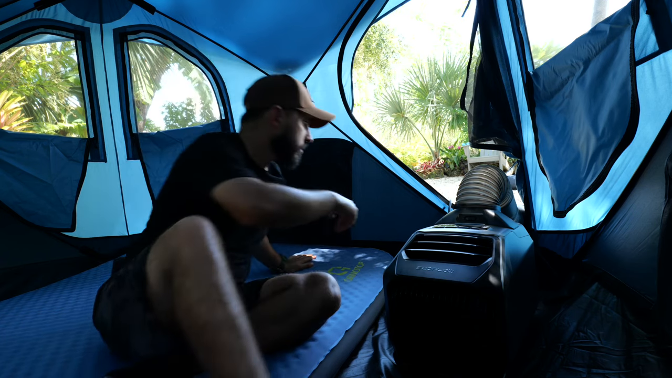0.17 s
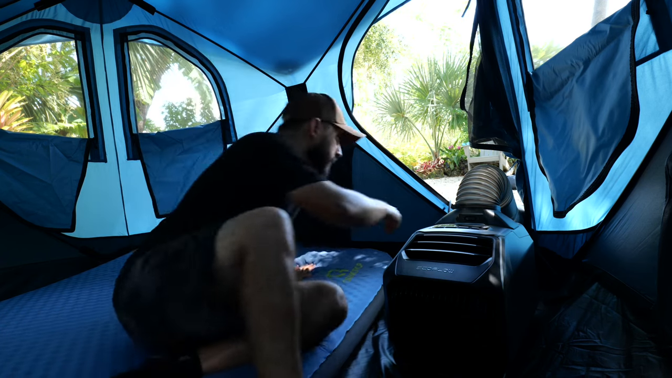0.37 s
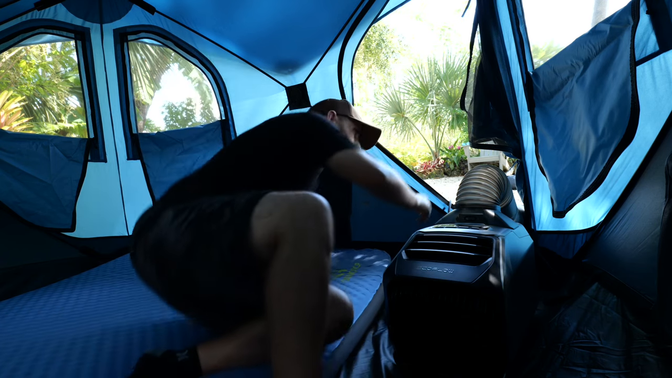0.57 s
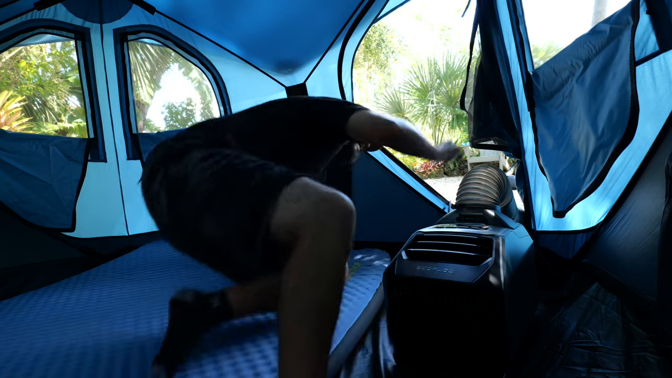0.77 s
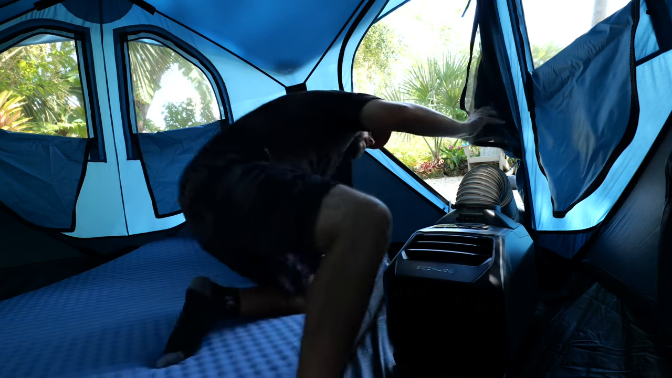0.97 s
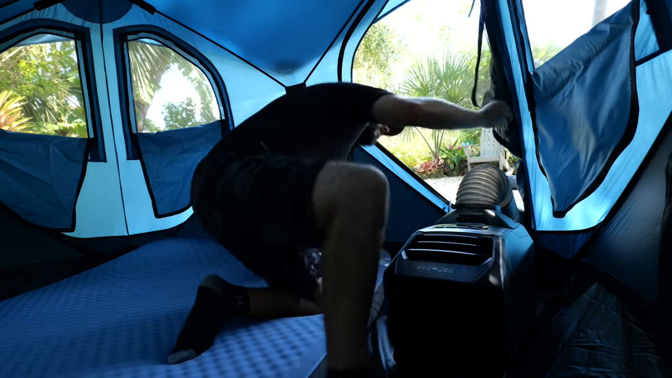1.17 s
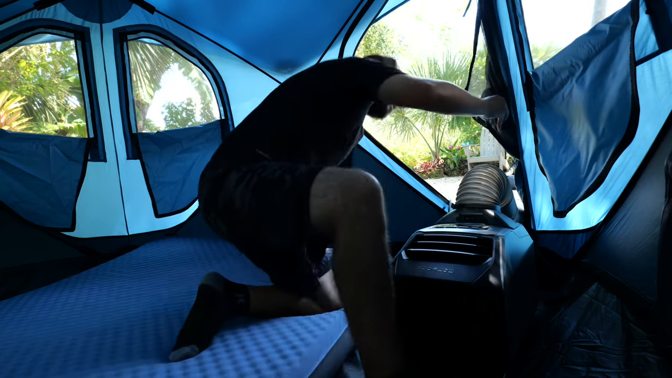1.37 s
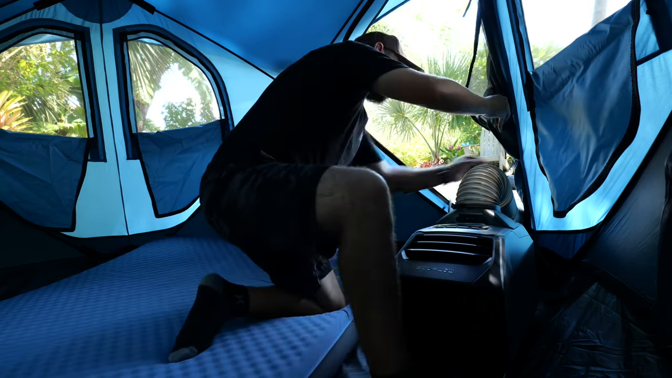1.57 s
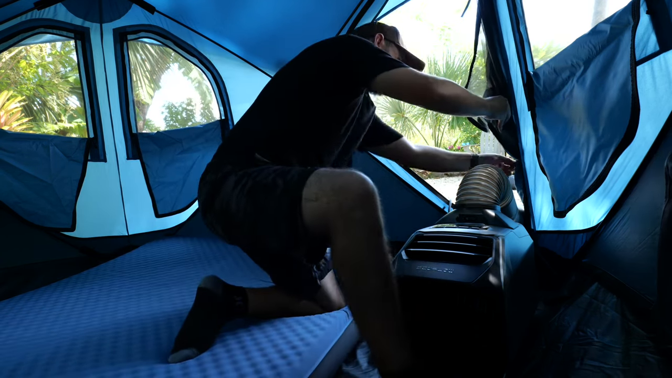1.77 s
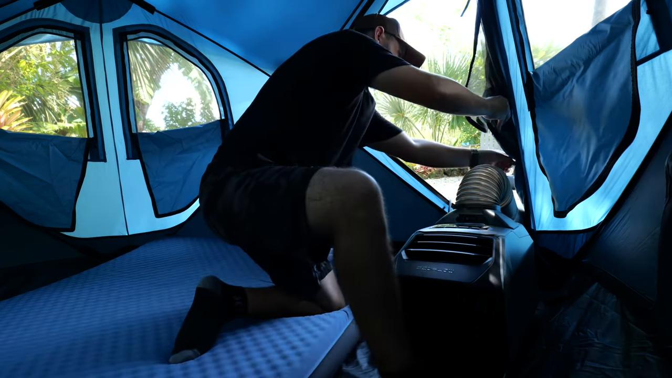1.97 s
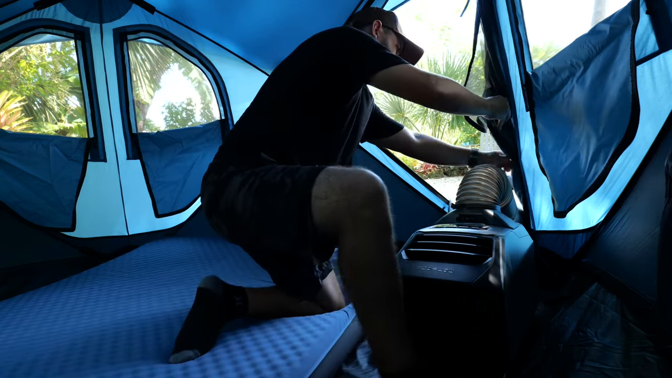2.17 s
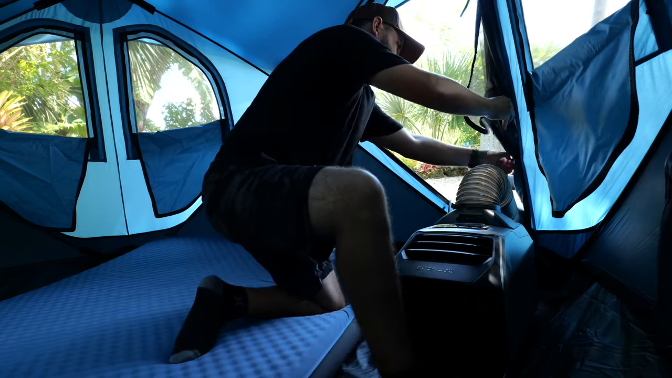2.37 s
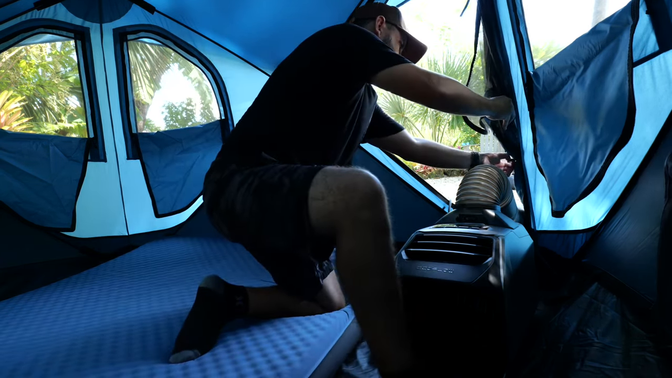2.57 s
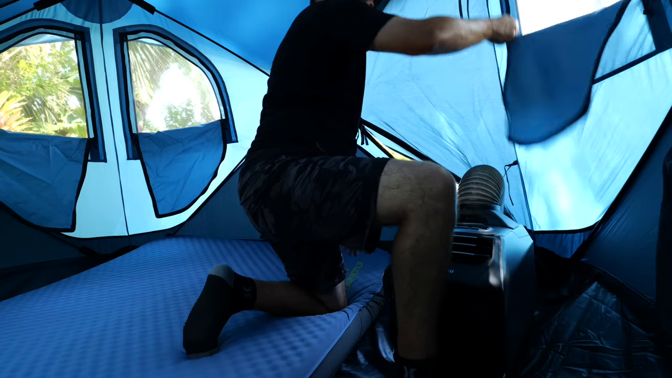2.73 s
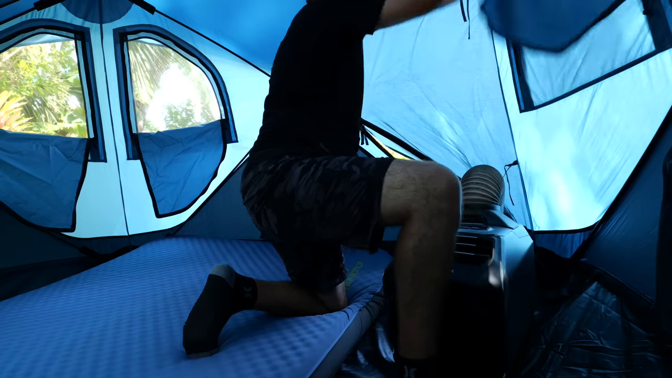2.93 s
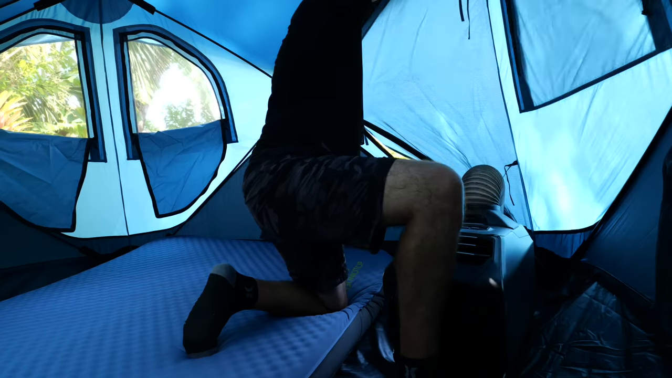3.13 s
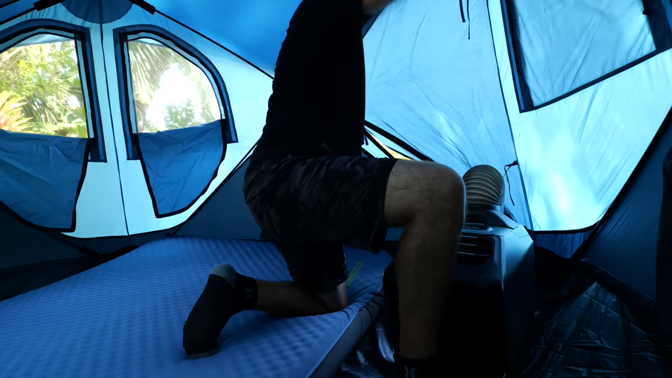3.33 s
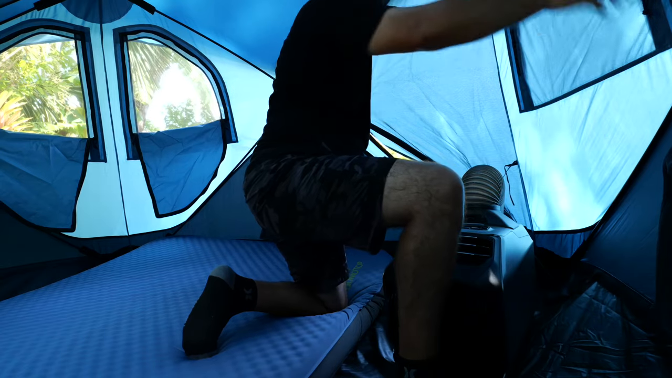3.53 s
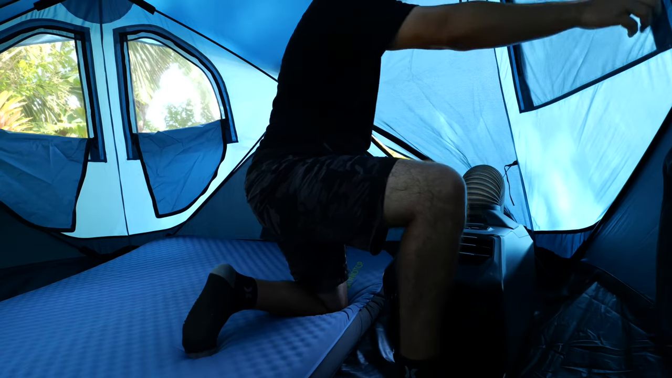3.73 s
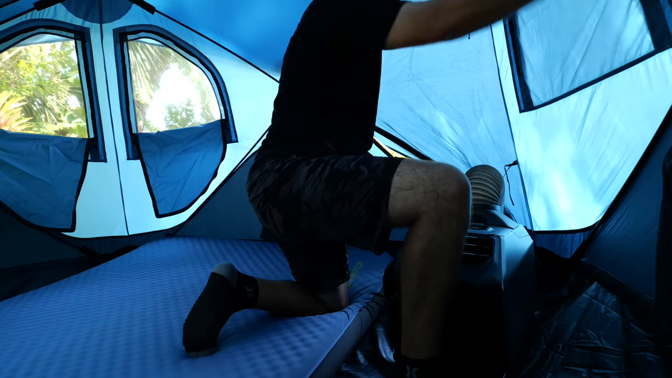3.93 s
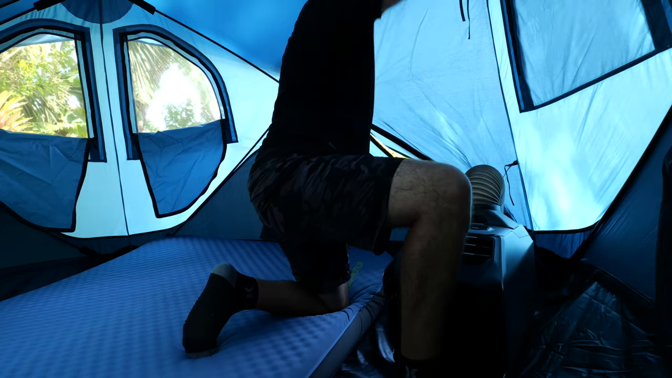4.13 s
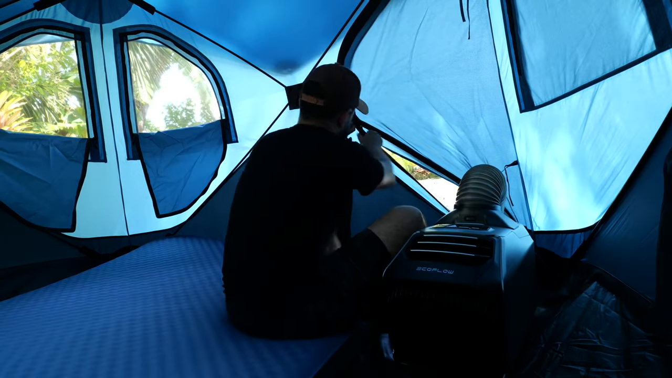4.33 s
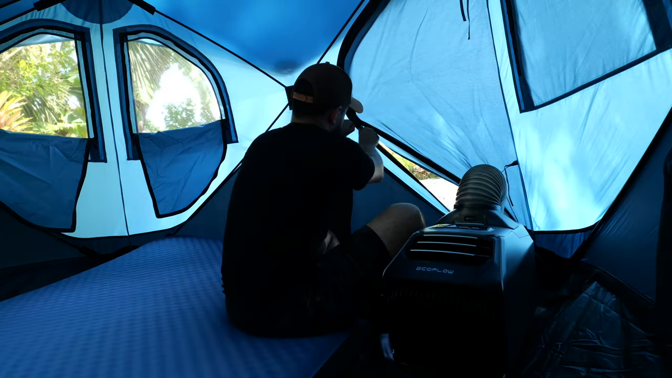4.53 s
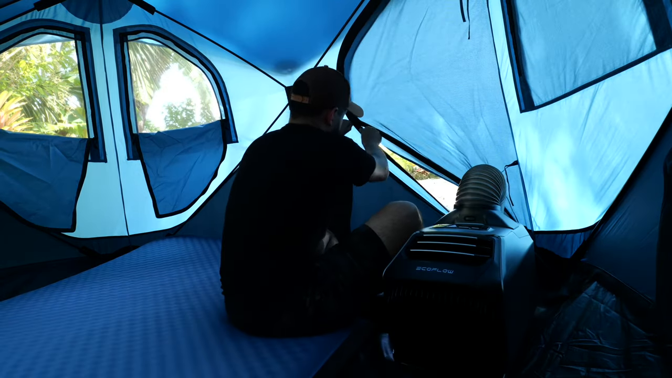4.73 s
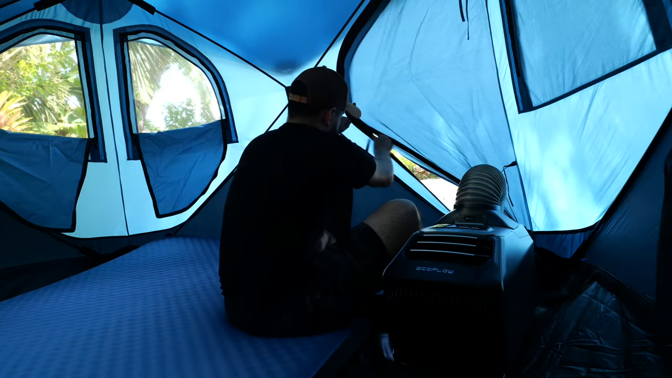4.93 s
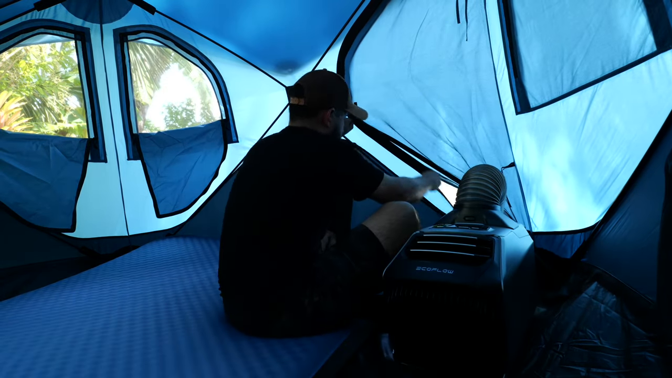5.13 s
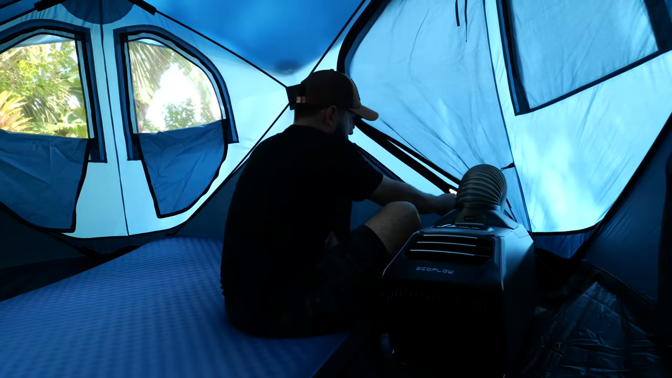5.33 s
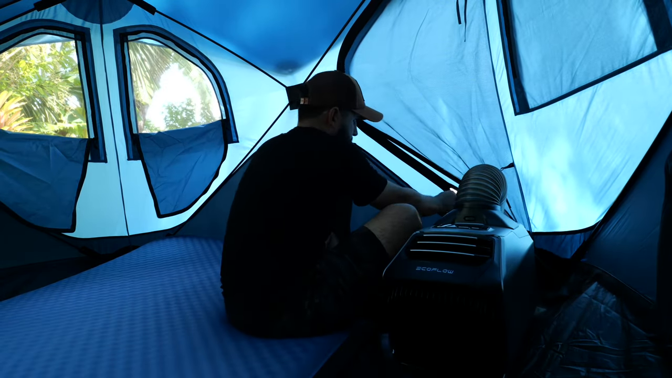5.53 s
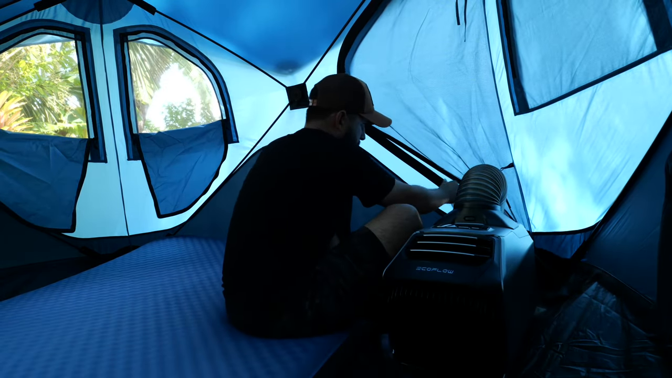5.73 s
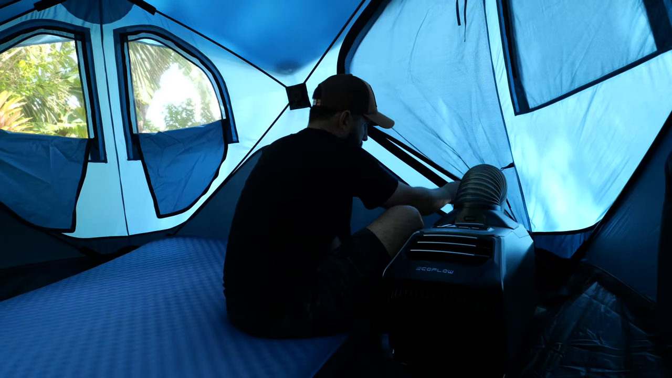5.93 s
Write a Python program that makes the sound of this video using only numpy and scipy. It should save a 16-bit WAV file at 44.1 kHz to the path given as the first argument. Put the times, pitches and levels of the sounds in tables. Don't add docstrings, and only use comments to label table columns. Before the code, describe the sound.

Nylon tent fabric rustles, snaps and billows up close as three zipper pulls rasp and sing, the last one starting slowly after metallic clinks.

```python
import sys
import numpy as np
from scipy import signal
from scipy.fft import rfft, irfft, next_fast_len
from scipy.io import wavfile
from scipy.ndimage import uniform_filter1d, map_coordinates

SR = 44100
rng = np.random.default_rng(int(sys.argv[2]) if len(sys.argv) > 2 else 0)


def decibels_to_gain(level_db):
    exponent = np.asarray(level_db, float) / 20
    return 10 ** exponent


def master_out(mix):
    frames = np.transpose(np.atleast_2d(mix))
    ceiling = np.clip(frames, -1, 1)
    pcm = np.round(ceiling * 32767).astype(np.int16)
    wavfile.write(sys.argv[1], SR, pcm)


N = 268965
T = np.arange(N) / SR
CLICK_RISE_S = 0.0008


def unit(x):
    return x / np.sqrt(np.mean(x ** 2) + 1e-20)


def curves(rows):
    s, *cols = np.transpose(rows)
    gate = np.clip(np.minimum(T - s[0], s[-1] - T) / 0.0035 + 0.5, 0, 1)
    return [np.interp(T, s, c) for c in cols] + [gate]


def wobble(rate):
    coarse = T[::16]
    knots = rng.standard_normal(int(N * rate / SR) + 4)
    return np.interp(T, coarse, map_coordinates(knots, [coarse * rate]))


def blur(rate):
    return (wobble(rate) + 1j * wobble(rate)) / np.sqrt(2)


def coloured(x, points, lo_hz, hi_hz):
    m = 2 * next_fast_len(N // 2 + 4096)
    hz = np.fft.rfftfreq(m, 1 / SR) + 1
    f, db = np.transpose(points)
    edges = 1 / np.sqrt((1 + (lo_hz / hz) ** 6) * (1 + (hz / hi_hz) ** 6))
    gain = decibels_to_gain(np.interp(np.log(hz), np.log(f), db)) * edges
    cep = irfft(np.log(gain + 1e-6), m)
    cep[1:m // 2] *= 2
    cep[m // 2 + 1:] = 0
    return unit(irfft(rfft(x, m) * np.exp(rfft(cep)), m)[:N])


def grainy(patchy_db, per_s, spread_db):
    z = signal.stft(rng.standard_normal(N), nperseg=512)[2]
    field = uniform_filter1d(rng.standard_normal(z.shape), size=7, axis=0)
    field = unit(uniform_filter1d(field, size=7, axis=1))
    bed = unit(signal.istft(z * decibels_to_gain(patchy_db * field), nperseg=512)[1][:N])
    sizes = decibels_to_gain(spread_db * np.minimum(rng.exponential(size=N), 4))
    starts = (rng.random(N) < per_s / SR) * sizes
    burst = signal.lfilter([1], [1, -np.exp(-1 / (0.0014 * SR))], starts)
    return bed * (1 + 0.33 * burst)


def add(out, s, piece):
    part = out[round(s * SR):][:len(piece)]
    part += piece[:len(part)]


def strokes(rows, spans, rest_db):
    attack_db_per_s, release_db_per_s = 345, 263
    s, length, press_db, slide_db = np.transpose(rows)[..., None]
    t = T[::16]
    build_db = attack_db_per_s * (s - t).clip(0)
    die_db = release_db_per_s * (t - s - length).clip(0)
    shape_db = press_db - build_db - die_db
    gate = sum((T >= a) * (T < b) for a, b in spans)

    def total(db, floor_db):
        power = decibels_to_gain(2 * floor_db) + decibels_to_gain(2 * db).sum(axis=0)
        return gate * np.interp(T, t, np.sqrt(power))

    return total(shape_db, rest_db), total(shape_db + slide_db, rest_db + np.mean(slide_db))


# start in seconds, length in seconds, pressure in dB, slide in dB re pressure.
STROKES = [(0.066, 0.033, -51, 14.5), (0.284, 0.015, -23, -6), (0.333, 0.31, -27.5, -7.5),
           (0.67, 0.033, -29.5, 1.5), (0.732, 0.19, -38.5, 9.5), (0.925, 0.037, -24, -16),
           (0.986, 0.015, -29.5, -1), (1.036, 0.088, -27.5, 3.5), (1.161, .14, -24, 0.5),
           (1.356, 0.059, -33.5, 1.5), (4.386, 0.052, -24.5, -3.5), (4.472, 0.036, -25, -3.5),
           (4.57, 0.4, -31.5, -4.5), (5.372, 0.2, -34, -6), (5.623, 0.1, -27, -7),
           (5.77, 0.12, -34.5, -2.5), (5.97, 0.05, -26.5, -1.5), (6.055, 0.026, -36, -0.5)]
# [s, s, dB, dB].
TUGS = [(1.53, 0.067, -34, -6), (1.619, 0.026, -27, -4.5), (1.68, .14, -30, -3), (1.85, 0.2, -31.5, -5.5),
        (2.07, 0.11, -30.5, -3.5), (2.199, 0.086, -24.5, -7.5), (2.33, 0.058, -31.5, -2),
        (2.423, 0.046, -25, -6.5), (2.51, 0.07, -34.5, -0.5), (2.621, 0.053, -25.5, -4)]
# [s, s, dB, dB].
REACHES = [(3.079, 0.12, -29.5, -20.5), (3.29, 0.027, -36.5, -25), (3.355, 0.01, -34, -33),
           (3.433, 0.14, -28, -21), (3.63, 0.055, -31, -22), (3.715, .045, -33.5, -16.5),
           (3.8, 0.14, -33, -20.5)]
# frequency in Hz, level in dB per Hz.
NEAR_WEAVE = [(53, -16), (90, -2), (201, -0.5), (376, -4), (579, -3.5), (819, -6.5), (3270, -13.5),
              (7620, -16.5), (14600, -26.5), (15900, -38)]
# frequency in Hz, level in dB per Hz.
DRAGGED_FLAP = [(53, -31), (90, 2), (130, 4.5), (260, -16), (303, -9), (579, -4.5), (735, -9), (1160, -9),
                (1750, -14.5), (2120, -4.5), (4000, -8.5), (5500, -10.5), (7000, -19), (8200, -20),
                (9880, -24.5), (14900, -35.5), (15900, -40)]
# frequency in Hz, level in dB per Hz.
FAR_WEAVE = [(53, -28), (90, -7), (401, -9), (784, -18), (855, -20.5), (1470, -21), (1640, -20),
             (3000, -24.5), (15900, -51)]
HANDLED = [
    [(0, 1.5), (4.306, 6.1)],
    [(1.5, 2.704)],
    [(2.704, 4.306)],
]
# resting level in dB, sheen in dB re swish, unrest as a factor.
FEEL = [
    (-43.5, -11.5, 0.71),
    (-48, -0.5, 0.43),
    (-42.5, -14, 1),
]


def cloth():
    out = np.zeros(N)
    jerk = 1.1 * wobble(25) + 1.6 * wobble(70)
    closer_db = 8.5 * (T > CUTS[1][0])
    weaves, handling = (NEAR_WEAVE, DRAGGED_FLAP, FAR_WEAVE), (STROKES, TUGS, REACHES)
    for weave, rows, spans, (rest_db, sheen_db, unrest) in zip(weaves, handling, HANDLED, FEEL):
        hand = decibels_to_gain(unrest * jerk)
        folds = grainy(patchy_db=3.9 * unrest, per_s=200, spread_db=4.5) * decibels_to_gain(1.2 * unrest * wobble(50))
        crumple = coloured(folds * hand, weave, 152, 1410)
        rub = grainy(patchy_db=1.76 * unrest, per_s=120, spread_db=1.0)
        swish = coloured(rub * hand, weave, 2400, 6030)
        threads = grainy(patchy_db=4.9 * unrest, per_s=150, spread_db=5.0)
        sheen = coloured(threads * hand, weave, 6150, 19000)
        press, slide = strokes(rows, spans, rest_db)
        out += press * crumple + slide * (decibels_to_gain(-2.5) * swish + decibels_to_gain(sheen_db + closer_db) * sheen)
    return out


# time in seconds, teeth per second, drag in dB, singing in dB.
PULL_A = [(2.704, 422, -17, -19), (2.752, 574, -9.5, -11.5), (2.79, 484, -12, -15), (2.855, 450, -11, -21),
          (2.89, 586, -11.5, -9.5), (2.94, 764, -10, -14.5), (2.98, 875, -12, -25),
          (3.055, 730, -11.5, -22), (3.081, 650, -17, -36)]
PULL_B = [(3.887, 623.1, -12.5, -29), (3.935, 665.3, -20.5, -13), (4.01, 976, -21.5, -35),
          (4.095, 886, -14.5, -28), (4.125, 1075, -15, -24), (4.199, 929, -17.5, -12.5),
          (4.263, 825, -17, -12.5), (4.281, 669, -10.5, -22.5), (4.305, 673, -34, -42)]
PULL_C = [(4.819, 136.2, -12, -28), (4.904, 145.8, -10, -13.5), (4.938, 198.5, -13.5, -13.5),
          (4.998, 494, -14.5, -21.5), (5.063, 677.9, -19.5, -17), (5.186, 410.8, -23.5, -25.5),
          (5.233, 454.5, -20.5, -14.5), (5.306, 236.6, -14.5, -27.5), (5.35, 118, -52, -24)]
# timing scatter in tooth gaps, noise share 0-1, tone blur 0-1, kick of a bent tooth in dB.
SLIDER = [
    (.085, .75, .5, 0),
    (.1, .8, .72, 3),
    (.04, .7, .4, 2),
]
OVERTONES = [
    (-11.5, -44, -26, -41, -58),
    (-15.5, -25, -27.5, -40, -39),
    (-7.5, -6, -15.5, -17.5, -19.5),
]
# frequency in Hz, level in dB per Hz.
PANEL = [
    [(88, -75), (150, -12), (327, -8.5), (438, -17.5), (575, -2.5), (1010, -5.5), (1230, -0.5),
     (1900, -14.5), (2300, -13), (2750, -22.5), (4500, -30), (9520, -46.5), (15800, -53)],
    [(88, -55), (150, -31), (587, -16.5), (955, -11), (1380, -15.5), (2000, -25.5), (2480, -29),
     (4720, -37.5), (5630, -46.5), (15800, -54)],
    [(88, -82), (150, -4), (285, -10.5), (438, -10), (647, -1.5), (727, -12), (866, -5.5), (1500, -23.5),
     (5000, -25), (5600, -28), (6200, -25.5), (7390, -25), (15800, -35)],
]
# octave tone in dB, its share of the singing swings,
# hiss in dB at 500 teeth per s, hiss in dB per octave of speed.
VOICE = [
    (-27, 0.082, -35, 2.5),
    (-29, 0.4, -48, 11.5),
    (-21, 0.11, -25.5, 1.5),
]
# frequency in Hz, half width in Hz, gain in dB.
CROSSED = [
    [(557, 59, 0.5), (1160, 65, 4.5), (2250, 300, 1.5)],
    [(800, 82, 3.5), (1300, 84, 7.5), (1700, 71, 3), (4400, 500, 10)],
    [(630, 73, 0.5), (880, 52, 8.5), (2000, 430, -4.5), (2780, 320, 2), (4000, 700, 10.5)],
]
# time in seconds, half width in seconds, share of speed.
LURCHES = [(2.8, 0.0097, -0.057), (2.831, 0.0094, 0.073), (2.958, 0.0082, 0.057), (4.04, 0.013, 0.046),
           (4.067, .012, -0.05), (4.205, .01, -.03), (4.232, 0.0071, 0.065), (4.247, 0.0059, -.07)]
# time in seconds, level change in dB.
SNAGS = [(2.783, -3), (2.806, -4), (2.853, -3.5), (2.927, -3), (2.975, 0), (2.992, -5), (3.012, -26),
         (4.051, -3), (4.116, -13), (4.17, -4), (4.209, -11), (4.241, -3), (4.269, -5.5), (4.963, -9),
         (5.13, 1.5), (5.196, 1), (5.262, -1)]


def zipper(rows, slider, overtones, panel, voice, crossed):
    rate, rasp_db, first_db, gate = curves(rows)
    rate = rate * (1 + sum(part * np.exp(-((T - s) / width) ** 2) for s, width, part in LURCHES))
    speed_octaves = np.log2(rate / 500)
    octave_db, share, hiss_db, hiss_db_per_octave = voice
    scatter, noisy, smear, bent_db = slider

    start_s, stop_s = 0.0053, 0.03
    moving = np.clip(np.minimum((T - rows[0][0]) / start_s, (rows[-1][0] - T) / stop_s), 0.03, 1)
    second_db = octave_db + share * (first_db + 15) + 20 * np.log10(moving)
    hiss_db = hiss_db + hiss_db_per_octave * speed_octaves + 20 * np.log10(moving)
    hiss_db += -7.5 * np.exp(-((T - 4.96) / 0.045) ** 2)

    fast = np.clip(rate / 400, 0.3, 1)
    teeth = np.cumsum(rate) / SR + scatter * (wobble(120) + wobble(45))

    def flutter(depth_db):
        return decibels_to_gain(depth_db * wobble(70))

    def lift(k):
        return decibels_to_gain(sum(db / (1 + ((k * rate - hz) / width) ** 2) for hz, width, db in crossed))

    def smeared(k):
        return 1.2 - 0.07 * k + (1.1 + 0.08 * k) * smear * blur(200 + 40 * k)

    tone = lift(1) * decibels_to_gain(first_db + 5.5) * (1 + smear * fast * blur(160)) * np.exp(2j * np.pi * teeth)
    for k, db in enumerate((0, *overtones), start=2):
        bright_db = 1.5 * (k - 0.5) * speed_octaves
        level = decibels_to_gain(second_db + 3.5 + db + bright_db) * lift(k) * flutter(0.58 * k)
        tone += level * smeared(k) * np.exp(2j * np.pi * k * teeth)
    snag_s = 0.012
    tone = tone.imag * decibels_to_gain(sum(dip_db * np.exp(-((T - s) / snag_s) ** 2) for s, dip_db in SNAGS))

    kicks = np.diff(np.floor(teeth), prepend=0).clip(0)
    kicks = kicks * decibels_to_gain(1.4 * rng.standard_normal(N)) * gate / np.sqrt(rate)
    bent = kicks * decibels_to_gain(bent_db * (rng.random(N) < 0.04))
    gated = grainy(patchy_db=3.5, per_s=180, spread_db=1.5) * np.exp(-2.5 * (teeth % 1)) * gate
    grit = np.sqrt(1 - noisy * fast) * unit(bent) + np.sqrt(noisy * fast) * unit(gated)
    rasp = decibels_to_gain(rasp_db - 4.5) * flutter(2.6) * coloured(grit, panel, 194, 1990)
    spray = unit(gated) + 0.39 * unit(kicks)
    hiss = decibels_to_gain(hiss_db + 4.5) * flutter(0.12) * coloured(spray, panel, 2220, 11200)
    return gate * (tone + np.sqrt(np.mean(gate)) * (rasp + hiss))


# time in seconds, peak in dB, upper modes in dB.
JINGLE = [(4.462, -23.5, 3.5), (4.48, -19, 5), (4.4979, -8.5, -1.5), (4.5247, -24.5, 1.5),
          (4.8002, -11.5, -1), (4.8329, -2.5, -2), (5.312, -24, -6), (5.346, -30, -6), (5.384, -22.5, -1),
          (5.421, -26.5, -12)]
# frequency in Hz, level in dB, 60 dB decay time in seconds.
TAB = [(4240, 1, .06), (4370, -3, .05), (5335, -16, .045), (6870, -12, .07), (7560, -13, .03),
       (10220, 3, .075), (13900, -4, .06), (8530, -8, .014), (8860, -8, .016), (11200, -12, .03),
       (12750, -10, .02), (14850, -12, .04), (3600, -14, .02), (4680, -11, .03)]


def pull_tab():
    out, t = np.zeros(N), np.arange(SR // 4) / SR
    start, end = 4.85, 4.936
    shakes = []
    for s in np.linspace(start, end, num=13):
        fade_db = -2.5 * (s - start) / (end - start)
        shakes.append((s + 0.0013 * rng.standard_normal(), -16 + fade_db, -3.5))
    for s, db, upper_db in JINGLE + shakes:
        spread = 0.008 if start - 0.006 < s < end + 0.006 else 0.003
        ring = np.zeros(len(t))
        for hz, level, t60 in TAB:
            luck, detune = rng.standard_normal(2)
            mode_db = level + upper_db * (hz > 9000) + 1.8 * luck
            ring += decibels_to_gain(mode_db - 60 * t / t60) * np.sin(2 * np.pi * hz * (1 + spread * detune) * t)
        crack = np.diff(rng.standard_normal(len(t) + 1))
        ring += decibels_to_gain(-11 + upper_db / 2 - 60 * t / 0.012) * crack
        add(out, s, decibels_to_gain(db - 4.0) * ring * (1 - np.exp(-t / 0.000073)))
    return out * decibels_to_gain(4 * wobble(300))


# time in seconds, peak in dB, pitch in Hz.
POPS = [(.28, -19, 695), (.318, -12, 386), (.489, -18, 600), (.519, -15, 486), (0.53, -10.5, 286),
        (.554, -14, 576), (0.595, -13, 620), (0.625, -17, 452), (.661, -8.5, 540), (0.7, -16, 471),
        (1.2688, -3.5, 500), (1.316, 1.5, 1190), (3.147, -8, 1240), (3.192, -13, 700), (3.098, -14, 945),
        (3.428, -29, 394), (3.4565, -3, 396), (3.465, -7, 450), (3.502, -9, 297), (3.533, -4.5, 298),
        (3.572, -12, 520), (3.577, -8, 300), (3.596, -32, 300), (3.384, -22, 260), (3.783, -21, 296),
        (3.895, -17, 1190), (4.576, -6.5, 930), (4.657, -7, 880), (4.664, 8.5, 860), (4.798, 7, 527.5),
        (4.829, -5, 570), (5.661, -2.5, 497), (5.702, -14, 455), (5.783, -4, 500), (5.8359, -8.5, 510),
        (5.909, -14, 483), (5.967, -9.5, 665), (5.977, -12, 420), (5.791, -15, 297), (6.056, -8, 1170)]
# time in seconds, peak in dB, pitch in Hz.
THUMPS = [(0.225, -33, 180), (0.914, -16, 168), (1.243, -8, 149), (2.75, -14.5, 90), (2.988, -18, 80),
          (3.482, -6.5, 131), (3.555, -9.5, 244), (3.918, 2, 215), (3.978, -12.5, 69.25), (4.271, -20, 70),
          (4.334, -12.5, 172), (4.795, 0.5, 119), (4.827, -3, 156.6), (5.208, -12.5, 153),
          (5.332, -11, 105.6), (5.511, -15, 194), (5.557, -13.5, 104), (5.681, -9.5, 165),
          (5.831, -12, 224), (5.988, -16.5, 144)]


def pops():
    out, t = np.zeros(N), np.arange(SR // 10) / SR
    for s, db, hz in POPS + THUMPS:
        cycles = 2.3 + 0.32 * np.log2(hz / 300)
        turn = hz * t * (1 - 1.3 * t)
        swell = turn / (0.19 * cycles)
        envelope = swell * np.exp(1 - swell)
        edge = 0.17 * np.sin(2 * np.pi * 3.08 * turn) * envelope
        add(out, s, decibels_to_gain(db - 1.5) * (np.sin(2 * np.pi * turn) - edge) * envelope)
    return out


# time in seconds, peak in dB, pitch in Hz.
CLICKS = [(0.2788, -7, 3370), (.9978, -30, 1280), (1.0065, -12, 2060), (1.029, -4, 3270),
          (1.186, -13, 3000), (1.314, -14, 4000), (1.409, -7, 3100), (1.448, -12, 3730), (1.789, -11, 4350),
          (1.8455, -9, 5660), (2.0157, -7.5, 2210), (2.0615, -9, 5660), (2.108, -7, 5600),
          (2.258, -5, 2560), (2.4502, -3, 2100), (2.513, -6, 4900), (2.588, -4, 6430), (2.6298, -24, 5200),
          (2.651, -2, 5100), (2.7473, -20, 2160), (2.893, -23, 2304), (2.9598, -13.5, 1896),
          (2.9756, -22, 2190), (3.029, -29, 2080), (3.066, -22, 2303), (3.145, -6, 1900),
          (3.1925, -35, 1800), (3.558, -22, 4240), (3.573, -21, 4000), (3.921, -22, 3488),
          (4.4644, 0, 8600), (4.468, -12, 7000), (4.4796, -8, 8650), (4.4824, -3, 6900), (4.497, 5, 7360),
          (4.578, 2, 1600), (4.663, 3.5, 1700), (4.7997, 3.5, 10840), (4.832, -16, 4380),
          (5.384, -8.5, 11900), (5.5122, -12, 1500), (5.5617, -8, 1570), (5.617, -4, 1940),
          (5.633, 0.5, 7200), (5.6689, -2.5, 6260), (5.679, -3, 3280), (5.687, -8, 3030),
          (5.7032, -5.5, 3090), (5.716, -5, 4000), (5.731, -8.5, 2520), (5.761, -15, 1800),
          (5.781, -7.5, 3680), (5.829, -7, 2950), (5.85, -6, 2540), (5.914, 3.5, 7560), (5.966, 1, 2960),
          (5.998, -2, 4960), (6.006, -5, 5500), (6.016, -4, 2960), (6.054, 0.5, 2750)]
# time in seconds, peak in dB, pitch in Hz.
CREASES = [(1.064, -1.5, 1300), (1.08, 0.5, 2450), (1.1215, -1, 2700), (1.1701, 0.5, 1060),
           (1.197, -4, 1390), (5.97, 0.5, 2470), (5.989, -0.5, 2350)]


def clicks():
    out, t = np.zeros(N), np.arange(SR // 10) / SR
    crack = coloured(rng.standard_normal(N), NEAR_WEAVE, 580, 22000)
    events = [(s, db, hz, 0.026) for s, db, hz in CLICKS]
    events += [(s, db, hz * (1 + 0.018 * rng.standard_normal()), 0.035) for s, db, hz in CREASES]
    for s, db, hz, t60 in events:
        ring = 0.3 * np.sin(2 * np.pi * hz * t) * decibels_to_gain(-130 * t / t60)
        top_hz = min(2.2 * hz, 20000)
        piece = np.roll(crack, -round(s * SR))[:len(t)]
        spray = signal.lfilter(*signal.butter(2, top_hz / (SR / 2)), piece)
        noise = 0.21 * spray * decibels_to_gain(-60 * t / t60)
        add(out, s, decibels_to_gain(db) * (ring + noise) * (1 - np.exp(-t / CLICK_RISE_S)))
    return out


# time in seconds, peak in dB, pitch in Hz.
TICKS = [(2.4024, -20, 1520), (2.7944, -16.5, 1480), (2.8325, -5.5, 1500), (2.8444, -10, 1500),
         (2.9602, 0, 1510), (2.9754, -0.5, 1500), (3.0124, -7.5, 1505), (3.0644, -9, 1500),
         (3.2954, -35, 1500), (3.3119, -27, 1500), (3.3588, -36, 1500), (3.3714, -32, 1470),
         (3.3802, -25, 1490), (3.4151, -37, 1500), (3.4276, -34, 1500), (3.4364, -26, 1500),
         (3.4524, -17, 1500), (3.4694, -19, 1500), (3.5019, -25, 1500), (3.5019, -19, 1500),
         (3.5314, -23, 1500), (3.5583, -18, 1500), (3.5718, -19, 1500), (3.6004, -28, 1500),
         (3.6314, -32, 1500), (3.6414, -30, 1500), (3.685, -30, 1500), (3.7095, -26, 1500),
         (3.7444, -24, 1500), (3.7738, -24, 1500), (3.8152, -30, 1500), (3.8294, -35, 1500),
         (4.2233, -8, 1500), (5.2031, -9, 1498), (5.4211, -6.5, 1500)]


def ticks():
    out, t = np.zeros(N), np.arange(SR // 40) / SR
    dull = [(500, 0.5), (2000, -4), (4000, -16), (15000, -50)]  # (Hz, dB)
    spit = coloured(rng.standard_normal(N), dull, 500, 5000)
    rise = 1 - np.exp(-t / CLICK_RISE_S)
    for s, db, hz in TICKS:
        swell = hz * t / 0.71
        snap = 0.74 * np.sin(2 * np.pi * hz * t) * (swell * np.exp(1 - swell)) ** 2
        noise = 0.5 * rise * spit[round(s * SR):][:len(t)] * decibels_to_gain(-60 * t / 0.01)
        add(out, s, decibels_to_gain(db - 1.8) * (snap + noise))
    return out


# time in seconds, level in dB.
SCRUNCH = [(.99, -30), (1.03, -25.5), (1.08, -20.5), (1.14, -22), (1.155, -36), (1.17, -23), (1.2, -25),
           (1.23, -48)]


def scrunch():
    level_db, gate = curves(SCRUNCH)
    crackle = grainy(patchy_db=0.5, per_s=360, spread_db=0.0)
    bunched = [(800, -4.0), (1300, 3.0), (2000, -3), (3200, 0.5), (5000, -7)]  # (Hz, dB)
    return gate * decibels_to_gain(level_db) * coloured(crackle, bunched, 930, 4900)


# start in
# seconds, length in seconds, from Hz, to Hz, level in dB, unevenness 0-1.
CHIRPS = [(0.813, 0.048, 2510, 2710, -30, .25), (0.836, 0.036, 2750, 2430, -29, .25),
          (1.736, 0.053, 2970, 3190, -35, .4), (3.712, 0.05, 960, 800, -21, .7),
          (3.74, 0.025, 640, 576, -20, .5), (3.708, 0.04, 1510, 1300, -29, .9),
          (3.738, 0.025, 1400, 1150, -25, .9), (3.72, .04, 2250, 2100, -40, .9),
          (5.235, .1, 5500, 5850, -27, .9), (5.14, .03, 6000, 5900, -28, .9),
          (5.25, .08, 7300, 7200, -31, .9), (2.575, .03, 6600, 6500, -33, .9)]


def chirps():
    out, slip = np.zeros(N), blur(260)
    for s, length, from_hz, to_hz, db, uneven in CHIRPS:
        u = np.arange(round(length * SR)) / (length * SR)
        grip = 1 - uneven / 2 + uneven * slip[round(s * SR):][:len(u)]
        phase = 2 * np.pi * np.cumsum(from_hz + (to_hz - from_hz) * u) / SR
        add(out, s, decibels_to_gain(db + 0.5) * np.sin(np.pi * u) * (grip * np.exp(1j * phase)).imag)
    return out


# time in seconds, level in dB.
BILLOW = [(0, -48), (.3, -39.5), (.71, -39), (1.25, -43), (1.45, -39), (2.6, -40.5), (2.95, -31.5),
          (3.3, -34.5), (3.5, -22), (3.75, -30), (3.98, -31.5), (4.25, -29.5), (4.4, -47), (4.8, -24.5),
          (5.1, -37), (5.6, -33), (6.1, -35.5)]
# frequency in Hz, level in dB per Hz.
AIR = [(11, -22), (18, -18), (70, 1), (121, 3), (168, -3), (250, 3.5), (320, -35), (550, -120)]


def billow():
    lumps = rng.standard_normal(N) * decibels_to_gain(3.6 * wobble(14))
    return decibels_to_gain(curves(BILLOW)[0] + 2.0) * coloured(lumps, AIR, 15, 176)


def insect():
    hz, width_hz, db = 5400, 40, -64
    line = np.sin(2 * np.pi * hz * T + 0.68 * wobble(width_hz)) * decibels_to_gain(1.4 * wobble(width_hz))
    return decibels_to_gain(db) * line * (T > CUTS[0][0]) * (T < CUTS[1][0])


def self_noise():
    return decibels_to_gain(-61.0) * coloured(rng.standard_normal(N), [(1000, -2), (16000, -11)], 3000, 16800)


# time in seconds, fade in seconds.
CUTS = [
    (2.703, 0.024),
    (4.305, 0.012),
]


def scene():
    hard = pops() + clicks() + pull_tab() + chirps() + ticks()
    pulls = zip((PULL_A, PULL_B, PULL_C), SLIDER, OVERTONES, PANEL, VOICE, CROSSED)
    hard += sum(zipper(*pull) for pull in pulls)
    t = np.arange(SR // 10) / SR
    walls = rng.standard_normal(len(t)) * decibels_to_gain(-60 * t / 0.059)
    delayed = np.pad(hard, (130, 0))
    wet = signal.fftconvolve(delayed, walls / np.linalg.norm(walls))[:N]
    mix = hard + decibels_to_gain(-10.5) * wet + cloth() + billow() + insect() + self_noise() + scrunch()
    for s, fade in CUTS:
        mix = mix * np.clip(np.abs(T - s) / fade, 0.05, 1)
    return np.array([mix, mix])


def band_limit(x):
    return signal.sosfilt(signal.butter(12, 16220, fs=SR, output="sos"), x)


def record(dry):
    x = signal.lfilter(*signal.butter(2, 45 / (SR / 2), "high"), dry)
    x = x / (1 + np.abs(x) ** 12) ** (1 / 12)
    x = signal.sosfiltfilt(signal.butter(16, 16100 / (SR / 2), output="sos"), x)
    trace = decibels_to_gain(np.minimum(-40 + 10 * wobble(12), -22)) * wobble(60) * x[0]
    return band_limit(x + [trace, -trace])


dry = scene()
out = record(dry)
master_out(out)
```